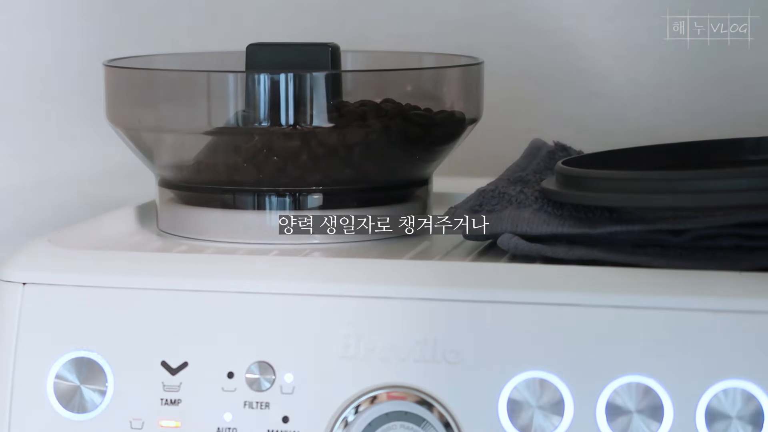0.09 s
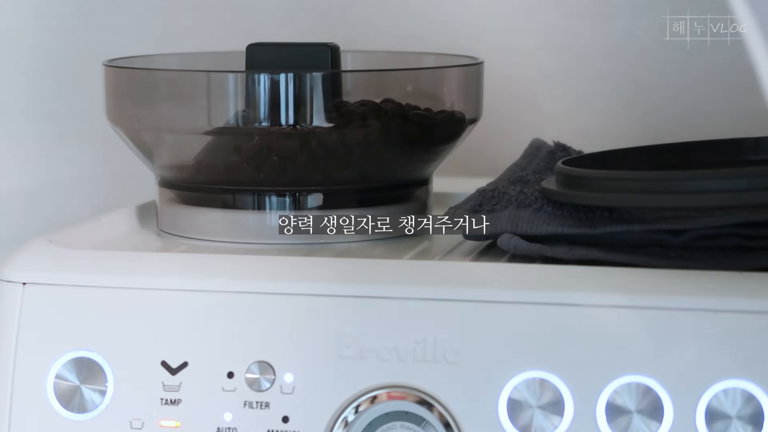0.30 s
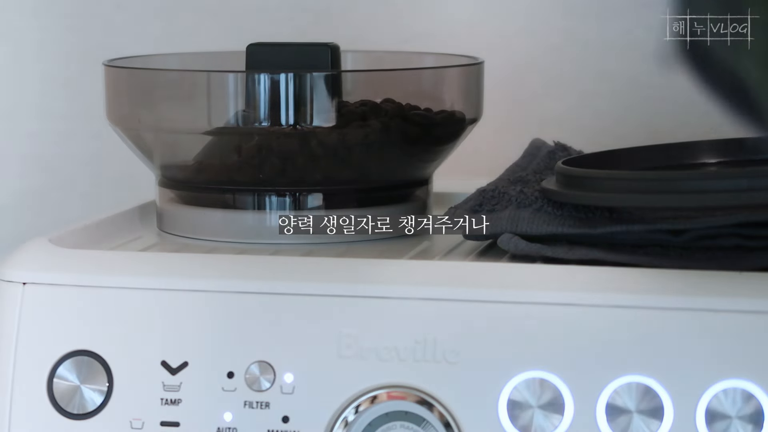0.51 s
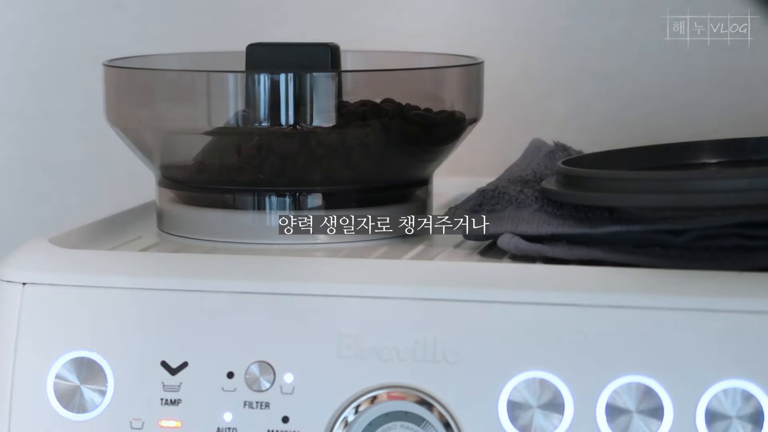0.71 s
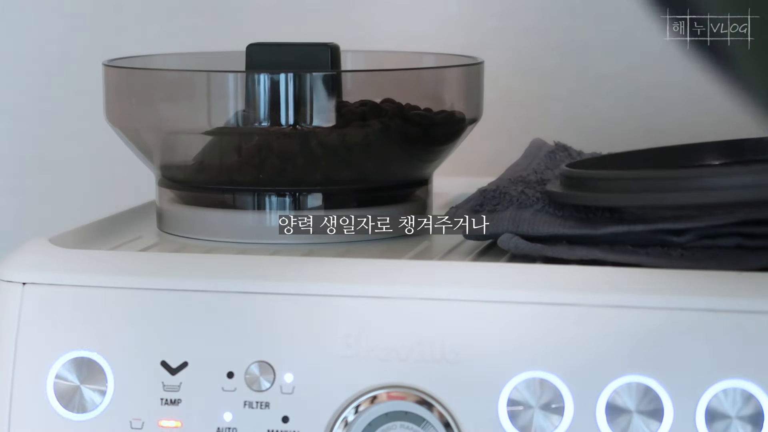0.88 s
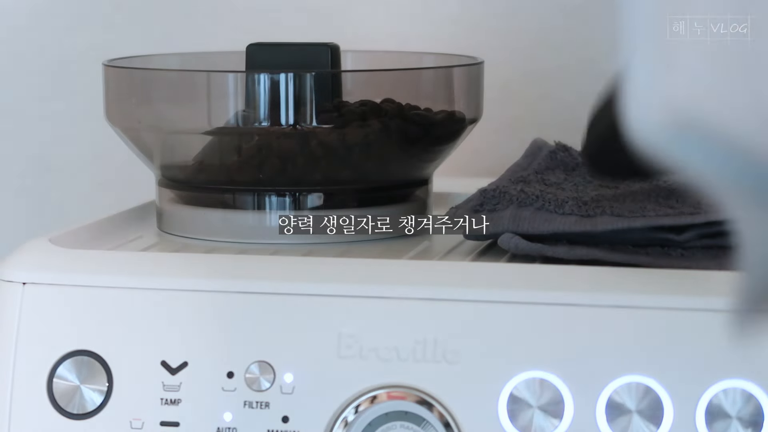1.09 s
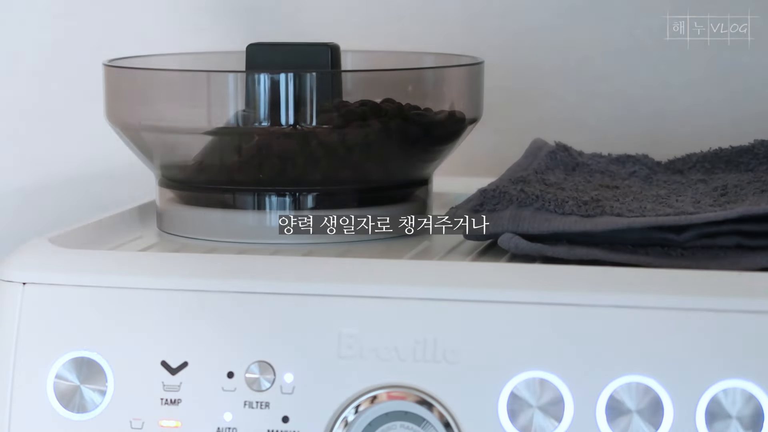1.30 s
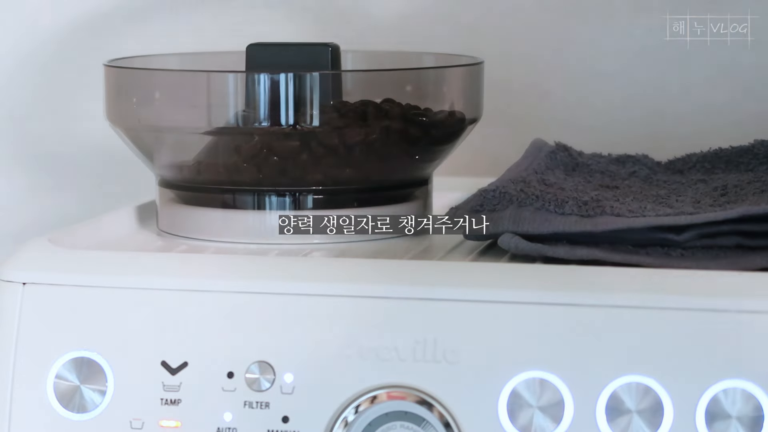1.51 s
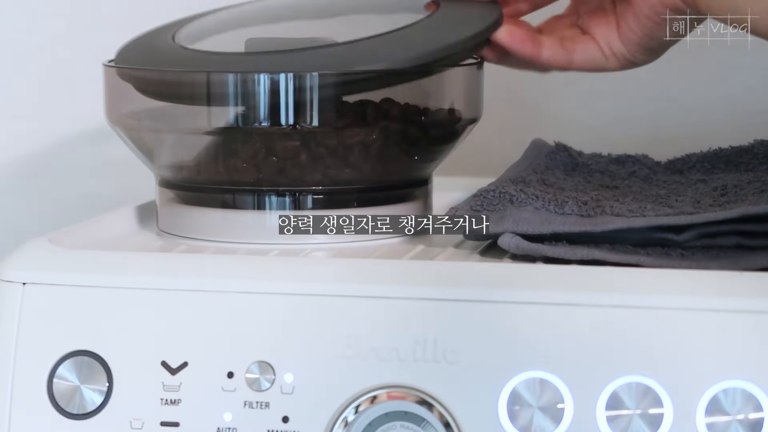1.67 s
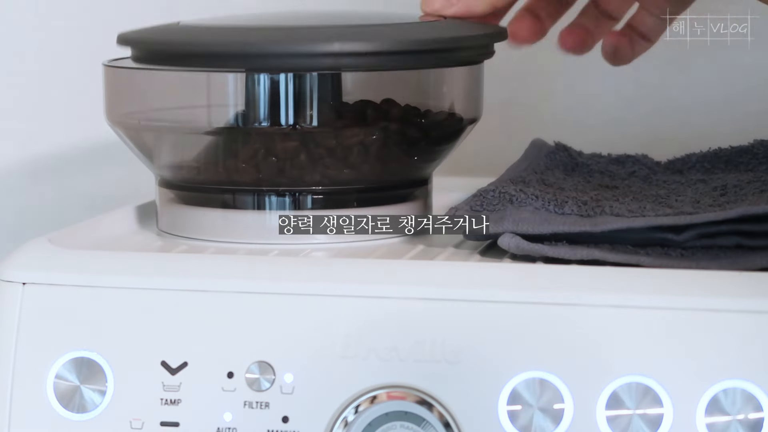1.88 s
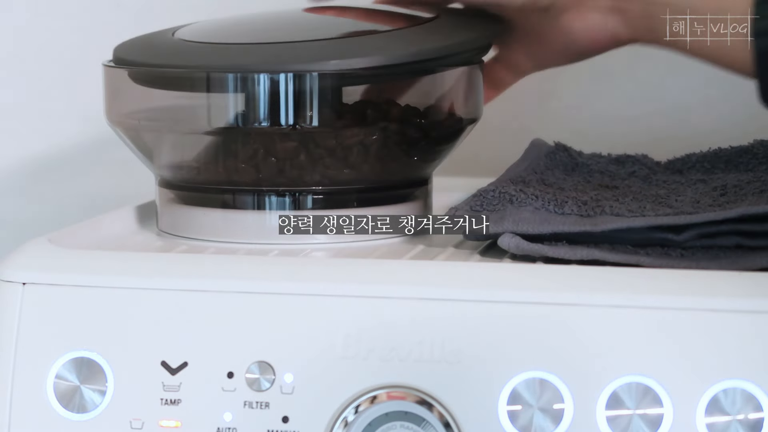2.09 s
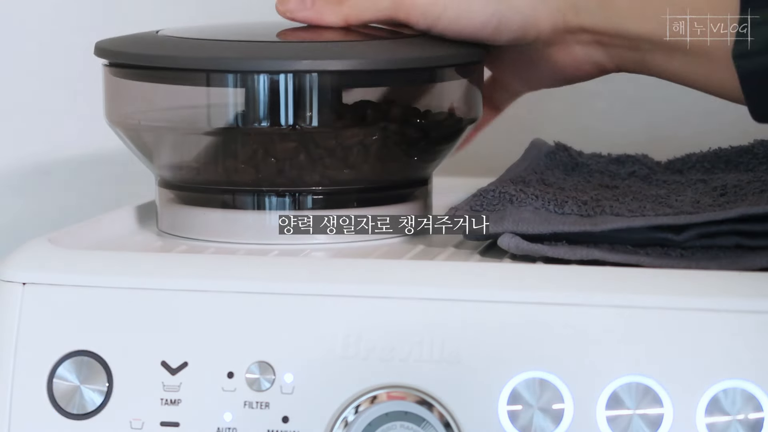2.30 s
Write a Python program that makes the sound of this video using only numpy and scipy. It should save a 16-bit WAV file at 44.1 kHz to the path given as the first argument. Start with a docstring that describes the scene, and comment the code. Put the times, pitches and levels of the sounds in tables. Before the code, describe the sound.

Plastic clatter in a small kitchen, closely miked in stereo: brief bean rustle, sharp double burst of canister knocks, a hollow plop, then a lid set down, scraping and thumping softly as it settles over faint machine hum.

```python
"""In a small kitchen, close to an espresso machine that hums softly throughout over steady noise.
The last beans slide and tick, a bean canister clatters shut, and something plops like a drip.
A plastic lid is then set on the grinder hopper, shifted and pressed home.
Contacts excite resonant modes, friction is uneven noise, and the hum, plop, rubs and booms are sines.
"""
import sys
import numpy as np
from scipy import signal
from scipy.fft import rfft, irfft
from scipy.io import wavfile
from scipy.ndimage import uniform_filter1d

SR = 44100
rng = np.random.default_rng(int(sys.argv[2]) if len(sys.argv) > 2 else 0)


def materialize(psi):
    """Save the field psi as 16-bit PCM at rate SR to the path in sys.argv[1].

    A 1-D psi becomes a single channel; in a 2-D psi each row is a channel.
    """
    bounded = np.clip(np.atleast_2d(psi).T, -1, 1)
    quanta = np.round(bounded * 32767).astype(np.int16)
    wavfile.write(sys.argv[1], SR, quanta)


N = 110250
T = np.arange(N) / SR  # scene time, s
RING = T[:16384]  # time axis of one response, s

# Resonances of the bean canister. Each row: frequency in Hz, t60 in seconds, peak level in dB.
CANISTER_MODES = [(261, 0.066, 7.5), (317.5, 0.2, 5.5), (420, 0.18, 2), (487, 0.071, 1), (677, 0.15, -0.5),
                  (820, 0.63, 0), (890, 0.16, -1.5), (942, 0.17, 0.5), (1016, 0.17, 2), (1165, 0.66, -0.5),
                  (1284, .2, 3), (1370, 0.088, 4), (2026, 0.29, -5.5), (3300, 0.023, -6), (4370, 0.02, 3),
                  (5770, 0.033, -3)]
# Spectrum of beans and canister together. Each row: frequency in Hz, gain in dB.
CANISTER_COLOUR = [(40, -28), (110, -9), (220, -11.5), (420, -1), (900, -2), (1700, -2), (3400, -1.5),
                   (6000, -7.5), (8000, -16), (11000, -20), (15000, -44)]
CANISTER_DB = -4


def undb(db):
    """Logarithmic level: decibels become an amplitude ratio."""
    return 10 ** (np.asarray(db) / 20)


def unit(x):
    """Energy normalisation: the squares sum to one."""
    return x / np.sqrt(np.sum(x ** 2) + 1e-18)


def unit_rms(x):
    """Power normalisation: the mean square is one."""
    return unit(x) * np.sqrt(len(x))


def decay(t60):
    """Exponential decay: the level falls 60 dB in t60 seconds."""
    return np.exp(-np.log(1000) * RING / t60)


def over_hz(points, hz):
    """Logarithmic frequency scale: interpolate (Hz, value) points along it."""
    f, v = np.array(points, float).T
    return np.interp(np.log(hz + 1e-3), np.log(f), v)


def through(x, response):
    """Linear system: convolve with its impulse response and keep the length."""
    return signal.fftconvolve(x, response)[:len(x)]


def colour(x, points):
    """Minimum phase: a causal filter built from the gain of (Hz, dB) points by folding the cepstrum."""
    size = 4096
    gain = undb(over_hz(points, np.fft.rfftfreq(size, 1 / SR)))
    cepstrum = irfft(np.log(gain))
    cepstrum[1:size // 2] *= 2
    cepstrum[size // 2 + 1:] = 0
    return through(x, irfft(np.exp(rfft(cepstrum))))


def add(out, s, x):
    """Superposition: mix x into out from time s."""
    i = max(int(s * SR), 0)
    out[i:i + len(x)] += x[:N - i]


def burst(t60):
    """Dense modes: decaying noise of unit energy with an even spectrum."""
    fade = decay(t60)
    x = rng.standard_normal(len(RING)) * fade
    for _ in range(4):
        x = irfft(np.exp(1j * np.angle(rfft(x))))  # flatten the spectrum
        power = np.abs(uniform_filter1d(x ** 2, 64))
        x = x * fade / np.sqrt(power + 1e-12)  # restore the decay
    return unit(x)


def body(modes, scatter_db=0):
    """Modal superposition: a bare crack plus damped modes, whose strengths depend on where it is struck."""
    out = 1. * (RING == 0)
    for (hz, t60, db), luck in zip(modes, rng.standard_normal(len(modes))):
        rate = np.log(1000) / t60
        peak = undb(db + scatter_db * luck) * 2 * rate / SR
        out += peak * np.exp(-rate * RING) * np.cos(2 * np.pi * hz * RING)
    return out


def grit(count, spread):
    """Stick-slip friction: tiny slips of very uneven size."""
    sign_and_size, unevenness = rng.standard_normal((2, count))
    return sign_and_size * np.exp(spread * unevenness)


def walk(rate):
    """Slow random fluctuation: levels held 1 / rate s and slewed twice; spread near 1."""
    k = int(SR / rate)
    held = rng.standard_normal(1024)[np.arange(N) // k]
    return 1.3 * uniform_filter1d(uniform_filter1d(held, k), k)


def swell(s, length):
    """Gaussian envelope: a smooth rise and fall around time s, with standard deviation length."""
    return np.exp(-((T - s) / length) ** 2 / 2)


def bloom(rise_s, t60):
    """Build-up and damping: a soft exponential attack and a steady decay."""
    return (1 - np.exp(-RING / rise_s)) * decay(t60)


def glide_tone(from_hz, to_hz, glide_s):
    """Frequency modulation: a sine whose pitch relaxes exponentially between two values."""
    hz = to_hz + (from_hz - to_hz) * np.exp(-RING / glide_s)
    return np.sin(2 * np.pi * np.cumsum(hz) / SR)


def contacts(table, modes, chatter_db, haze_db, haze_t60):
    """Impact excitation: a push, a brief bright chatter and a haze of dense short modes strike a body."""
    # Spectra of the push and of the chatter with haze. Each row: frequency in Hz, gain in dB.
    push_colour = [(600, 0), (1500, -3), (5000, -15), (12000, -8.5)]
    chatter_colour = [(300, -10.5), (700, 0), (1400, 0), (4000, -2.5)]
    out = np.zeros(N)
    for s, db, bass_db, treble_db, chatter_s, hard_db in table:
        age = RING / max(chatter_s, 1e-4)
        chatter = undb(chatter_db) * unit(grit(len(RING), 0.63) * np.sqrt(age) * np.exp(-age))
        haze = undb(haze_db) * unit(burst(haze_t60) * (1 - np.exp(-age)))
        push = undb(hard_db) * colour(1. * (RING == 0), push_colour)
        force = push + colour(chatter + haze, chatter_colour)
        struck = through(force, body(modes, scatter_db=2.5))
        tilt = [(450, bass_db), (1100, 0), (2200, 0), (6500, treble_db)]
        add(out, s, undb(db) * colour(struck, tilt))
    return out


def machine_hum():
    """Tonal hum: sines whose level and phase waver slowly."""
    # Components of the hum. Each row: frequency in Hz, mean RMS level in dB.
    hum_tones = [(58, -67), (92, -73), (240, -60.5)]
    out = np.zeros(N)
    for hz, db in hum_tones:
        level = np.sqrt(2) * undb(db + 0.45 * walk(12.2))
        out += level * np.sin(2 * np.pi * hz * T + 0.22 * walk(5.9))
    return out


def air():
    """Stationary background: steady noise of the kitchen, shaped by a fixed spectrum."""
    # Spectrum of the noise. Each row: frequency in Hz, relative level in dB.
    tone_colour = [(12, -44), (20, -19), (49, -7), (211, -12.5), (242, -17), (270, -10.5), (357, -17),
                   (409, -11.5), (525, -18), (753, -14.5), (1050, -22), (1240, -20.5), (1640, -23),
                   (12700, -45), (15000, -61)]
    return unit_rms(colour(rng.standard_normal(N), tone_colour)) * undb(-57)


def bean_slide():
    """Granular friction: the last beans slide as many uneven slips under a changing level."""
    # Level of the slide before colouring. Each row: time in seconds, level in dB.
    slide_level = [(0, -40.5), (.07, -38), (.11, -40.5), (.16, -37.5), (.21, -39), (.33, -39), (.42, -51)]
    # Spectrum of the slide. Each row: frequency in Hz, gain in dB.
    slide_colour = [(60, -7.5), (250, -1.5), (700, -4.5), (1500, -1), (3500, -10.5), (6000, -15),
                    (9000, -18.5), (15000, -31.5)]
    level = undb(np.interp(T, *np.array(slide_level).T))
    sliding = T < slide_level[-1][0]
    return colour(unit_rms(grit(N, 0.34)) * level * sliding, slide_colour)


def bean_ticks():
    """Impact on a resonator: beans tick and set the canister's modes ringing."""
    # Ticks of the beans. Each row: start in seconds, relative level in dB, extra bass in dB,
    # extra treble in dB, chatter time in seconds, hardness of the push in dB.
    tick_table = [(.001, -7, 5.5, -14, 0.0086, -1.5), (.0285, -10.5, 5, -13, 0.0017, -5),
                  (.0595, -11.5, 7.5, 0.5, 0.0031, -4), (.156, -15, 3.5, -15, 0.0035, 5),
                  (.177, -18, 14.5, -31, 0.0039, -4)]
    ticks = contacts(tick_table, CANISTER_MODES, chatter_db=4.5, haze_db=-3.5, haze_t60=0.08)
    return undb(CANISTER_DB) * colour(ticks, CANISTER_COLOUR)


def canister_hits():
    """Repeated impact: canister and cap clatter together and ring in the canister's modes."""
    # Knocks of the canister. Each row: start in seconds, relative level in dB, extra bass in dB,
    # extra treble in dB, chatter time in seconds, hardness of the push in dB.
    hit_table = [(.2210, 4.5, 2.5, -11, 0.0032, -3), (.2257, 3.5, 11.5, -6, 0.00023, -4.5),
                 (.2457, 5, 9, -5.5, 0.00072, -8.5), (.2504, 2, 7.5, 3.5, 0.00033, -1.5),
                 (.2575, 9.5, -2.5, -0.5, 0.00031, -0.5), (.2615, 6.5, -6, 0, 0.0023, -13),
                 (.4018, 1, 14, -5.5, 0.0004, 6), (.4072, 3, 3.5, -11, 0.00028, 2.5),
                 (.4392, -1.5, -6, -2, 0.001, 4), (.4522, 2.5, -4, 2, 0.009, -16),
                 (.4568, 6, -15, -1.5, 0.0044, -8), (.4623, 10, -8, -8, 0.00006, 8),
                 (.4657, 10, -3.5, 3.5, 0.00051, 2), (.5015, 1.5, 15, -5.5, 0.0056, -4),
                 (.5055, 4, 12, -1.5, 0.0015, -4.5), (.551, -12.5, 18, -20, 0.0031, -0.5)]
    hits = contacts(hit_table, CANISTER_MODES, chatter_db=1.5, haze_db=1, haze_t60=0.0616)
    return undb(CANISTER_DB) * colour(hits, CANISTER_COLOUR)


def cap_grates():
    """Driven resonance: slips of the cap, before it snaps shut, excite one quickly damped mode."""
    # Grates of the cap. Each row: centre in seconds, relative level in dB, length in seconds, pitch in Hz.
    grate_table = [(0.441, -8, 0.003, 2034), (.454, 0.5, 0.0029, 2160)]
    out = np.zeros(N)
    for s, db, length, hz in grate_table:
        ring = decay(0.0038) * np.sin(2 * np.pi * hz * RING)
        out += undb(db) * unit(through(grit(N, 0.24) * swell(s, length), ring))
    return undb(CANISTER_DB) * out


def plop():
    """Falling resonance: a quickly sinking tone, a click inside it and a hollow ring after it."""
    # Spectra of the click and of the hollow ring. Each row: frequency in Hz, gain in dB.
    click_colour = [(100, -28), (700, -9), (2000, -5), (3000, -17), (7000, -19), (11000, -29), (15000, -46)]
    hollow_colour = [(300, -14), (600, -5), (900, 1), (1400, -6.5), (2100, -8.5), (2900, -22), (8000, -36)]
    # Resonances of the hollow ring. Each row: frequency in Hz, t60 in seconds, peak level in dB.
    hollow_modes = [(907, 0.22, 5), (1200, .06, -3), (2050, .07, 1)]
    rise_s, fall_s = 0.0053, 0.003
    fall = np.exp(-np.maximum(RING - rise_s, 0) / fall_s)
    shape = np.minimum(RING / rise_s, 1) * fall
    tone = undb(-31.5) * glide_tone(from_hz=2095, to_hz=1170, glide_s=0.0029) * shape
    click = colour(unit(rng.standard_normal(len(RING)) * shape), click_colour)
    hollow = through(burst(0.226) * np.minimum(RING / 0.017, 1), body(hollow_modes))
    out = np.zeros(N)
    add(out, 1.0385, tone + click + colour(hollow, hollow_colour))
    return out


def lid_knocks():
    """Impact on a plastic shell: the lid knocks on the hopper and its modes ring."""
    # Knocks of the lid. Each row: start in seconds, relative level in dB, extra bass in dB,
    # extra treble in dB, chatter time in seconds, hardness of the push in dB.
    knock_table = [(1.7126, -1, 2, -2.5, 0.00088, 0), (1.7181, 0.5, -1.5, 1, 0.001, -3.5),
                   (1.733, -8.5, 1, -7, 0.0058, -14), (1.7635, -1, 6, 3, 0.004, -14),
                   (1.7730, -6.5, 8.5, 14.5, 0.0061, -4)]
    # Resonances of the lid. Each row: frequency in Hz, t60 in seconds, peak level in dB.
    lid_modes = [(254, 0.034, 4.5), (385, 0.024, 2.5), (436, .3, 0), (520, 0.15, 3), (566.6, 0.29, 4),
                 (720, 0.2, 5), (855, 0.31, 2.5), (1170, 0.08, -20), (1690, 0.08, 0), (2500, 0.044, 0.5),
                 (2870, 0.06, -4)]
    # Spectrum of the knocks. Each row: frequency in Hz, gain in dB.
    lid_colour = [(40, -30), (110, -4), (200, -3), (420, 3), (900, 0.5), (1700, -3), (3400, -4.5),
                  (6000, -12), (11000, -29.5), (15000, -40)]
    knocks = contacts(knock_table, lid_modes, chatter_db=-3, haze_db=-3.0, haze_t60=0.068)
    return colour(knocks, lid_colour)


def lid_flexes():
    """Flexural vibration: the lid's shell booms under a knock and sinks in pitch as it slackens."""
    # Booms of the shell. Each row: start in seconds, level in dB, starting pitch in Hz,
    # final pitch in Hz, rise in seconds, t60 in seconds.
    flex_table = [(1.7131, -27, 284, 250, .002, 0.081), (1.764, -22, 246, 166, 0.0072, 0.092)]
    out = np.zeros(N)
    for s, db, from_hz, to_hz, rise_s, t60 in flex_table:
        add(out, s, undb(db) * bloom(rise_s, t60) * glide_tone(from_hz, to_hz, glide_s=0.018))
    return out


def machine_rocks():
    """Low-frequency resonance: the hand's weight rocks the machine, which rumbles on its feet."""
    # Thumps of the machine. Each row: start in seconds, level in dB, rise in seconds.
    thump_table = [(1.772, -42, 0.0078), (1.802, -47, 0.026), (1.886, -49, 0.012), (2.124, -38.5, 0.012),
                   (2.164, -44.5, 0.007), (2.279, -48, .015), (2.361, -45, 0.0076), (2.407, -38, 0.0039)]
    # Resonances of the machine. Each row: frequency in Hz, t60 in seconds, relative level in dB.
    machine_modes = [(73, 0.44, -6.5), (98.7, 0.23, 2.5), (140, 0.14, -16), (186, 0.18, -14)]
    # Spectrum of the rumble. Each row: frequency in Hz, relative level in dB.
    rumble_colour = [(25, -34), (60, -16), (120, 9), (250, -9), (600, -22), (3000, -60)]
    out = np.zeros(N)
    for s, db, rise_s in thump_table:
        rock = np.zeros(len(RING))
        for hz, t60, mode_db in machine_modes:
            rock += undb(mode_db) * bloom(rise_s, t60) * np.sin(2 * np.pi * hz * RING)
        noise = unit_rms(colour(rng.standard_normal(len(RING)), rumble_colour))
        rumble = undb(-11) * noise * bloom(rise_s, 0.43)
        add(out, s, undb(db) * (rock + rumble))
    return out


def rim_scrapes():
    """Stick-slip on a resonator: the rim scrapes into its seat, each place favouring its own pitch and modes."""
    # Scrapes of the rim. Each row: centre in seconds, relative level in dB, length in seconds,
    # strongest pitch in Hz.
    scrape_table = [(1.778, -13.5, 0.018, 6600), (1.786, -3, 0.0048, 5700), (1.797, -9, 0.027, 6230),
                    (1.837, -13.5, 0.034, 5460), (2.139, -16, 0.0086, 4400), (2.171, -13, 0.0041, 4900),
                    (2.182, -21, 0.028, 6060), (2.394, -15.5, 0.0054, 2450), (2.399, -16, 0.0022, 6000),
                    (2.408, -13.5, 0.0027, 5900)]
    # Resonances of the rim. Each row: frequency in Hz, t60 in seconds, peak level in dB.
    rim_modes = [(2890, 0.017, 4), (3830, 0.015, -1.5), (4410, 0.014, 4.5), (4970, 0.039, 2),
                 (6050, 0.021, 3), (7430, 0.023, 8.5), (9600, 0.022, 6)]
    # Spectrum of all scrapes. Each row: frequency in Hz, gain in dB.
    rim_colour = [(60, 5), (400, 4.5), (1200, -3.5), (2800, -3.5), (5000, -3), (7500, -9), (10000, -13.5),
                  (15000, -31)]
    out = np.zeros(N)
    for s, db, length, hz in scrape_table:
        slips = unit(grit(N, 0.41) * swell(s, length))
        ringing = through(slips, body(rim_modes, scatter_db=1))
        focus = [(hz / 1.35, 0), (hz, 6.5), (hz * 1.67, 0)]
        out += undb(db) * colour(ringing, focus)
    return undb(-3.5) * colour(out, rim_colour)


def lid_rubs():
    """Friction-driven tone: the lid sings on the hopper, wavering and sagging in pitch over a dull scuff."""
    # Rubs of the lid. Each row: centre in seconds, level in dB, length in seconds.
    rub_table = [(2.126, -37, 0.0055), (2.173, -45.5, .013), (2.267, -45.5, 0.008)]
    # Spectrum of the scuff. Each row: frequency in Hz, gain in dB.
    scuff_colour = [(80, -11), (250, 13.5), (600, 9), (1000, -6.5), (3000, -19), (9000, -44)]
    out = np.zeros(N)
    for s, db, length in rub_table:
        sag_hz = 1900 * np.clip(T - s, -2 * length, 2 * length)  # 1900 Hz per second
        hz = 522 + 15 * walk(200) - sag_hz
        tone = np.sin(2 * np.pi * np.cumsum(hz) / SR)
        scuff = colour(rng.standard_normal(N), scuff_colour)
        out += undb(db) * swell(s, length) * (tone + scuff)
    return out


def room_tail():
    """Reverberation: noise in which every band of the small kitchen dies at its own rate."""
    # Reverberation time. Each row: band centre in Hz, t60 in seconds.
    band_t60 = [(100, 0.24), (500, 0.42), (2000, 0.34), (6000, 0.32), (14000, 0.16)]
    # Spectrum of the tail. Each row: frequency in Hz, gain in dB.
    tail_colour = [(100, -4), (400, -5), (1200, -5.5), (4000, -10), (12000, -9)]
    noise = rfft(rng.standard_normal(len(RING)))
    hz = np.fft.rfftfreq(len(RING), 1 / SR)
    tail = np.zeros(len(RING))
    for k, (_, t60) in enumerate(band_t60):
        # overlapping bands whose shares add up to one
        share = over_hz([(f, j == k) for j, (f, _) in enumerate(band_t60)], hz)
        tail += irfft(noise * share) * unit(bloom(0.0019, t60))
    return colour(tail, tail_colour)


def scene():
    """Spatial coherence: two close microphones share the bass; nearby surfaces and room part their treble."""
    # Stereo width of the contacts, then of the air. Each row: frequency in Hz, side gain in dB.
    contact_width = [(60, -59), (180, -30), (700, -24), (1400, -17), (2800, -12), (5600, -5.5),
                     (10000, 2.5), (14000, 5)]
    air_width = [(60, -42), (110, -14.5), (200, -7), (380, -2), (700, -7.5), (1290, -3), (2380, -1.5),
                 (4400, 1), (8120, 0), (15000, -1)]
    beans_and_canister = bean_slide() + bean_ticks() + canister_hits() + cap_grates()
    lid = lid_knocks() + lid_flexes() + machine_rocks() + rim_scrapes() + lid_rubs()
    dry = beans_and_canister + plop() + lid
    mid = dry + through(dry, room_tail()) + machine_hum() + air()
    reflections = unit(burst(0.045) + undb(3.5) * room_tail())
    side = colour(through(dry, reflections), contact_width) + colour(air(), air_width)
    return np.array([mid + side, mid - side])


def record(dry):
    """Band limiting: the recorder's steep elliptic low-pass cuts the top above 15 kHz."""
    lowpass = signal.ellip(8, .2, 70, 15000, fs=SR, output="sos")
    return signal.sosfilt(lowpass, dry)


dry = scene()
out = record(dry)
materialize(out)
```